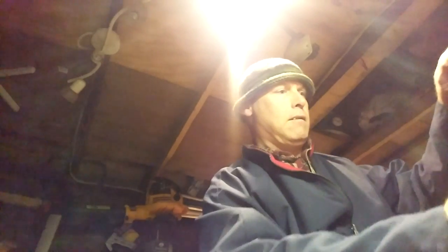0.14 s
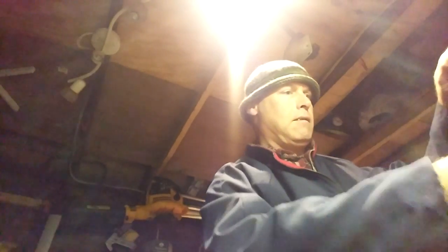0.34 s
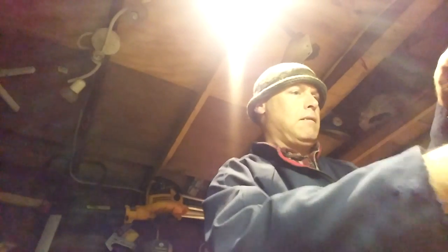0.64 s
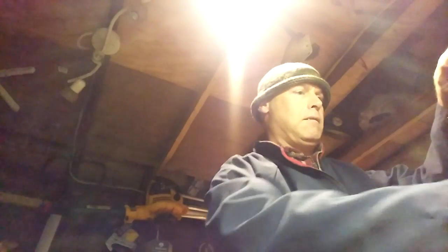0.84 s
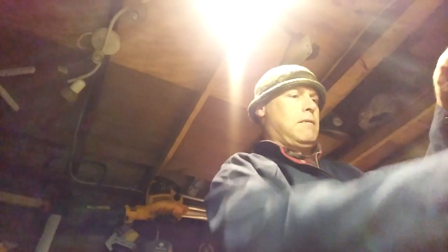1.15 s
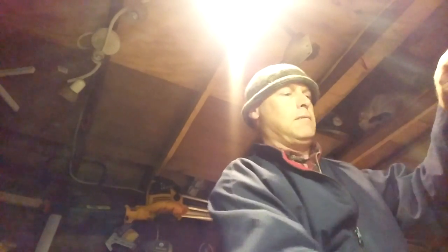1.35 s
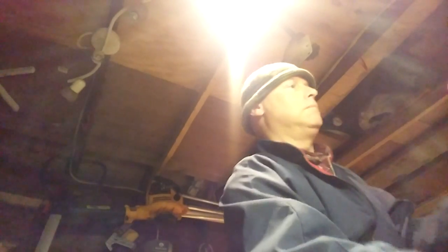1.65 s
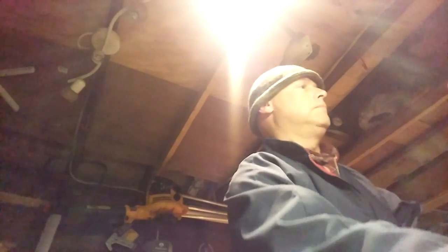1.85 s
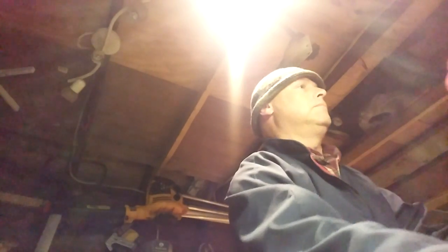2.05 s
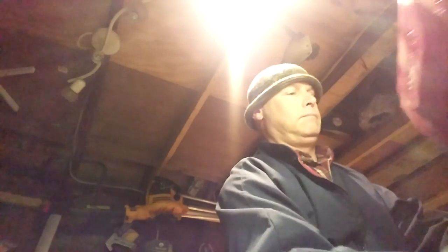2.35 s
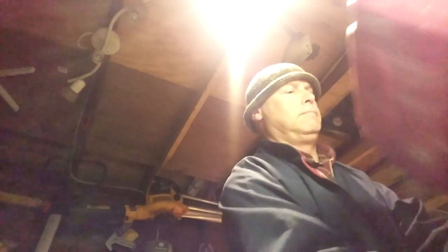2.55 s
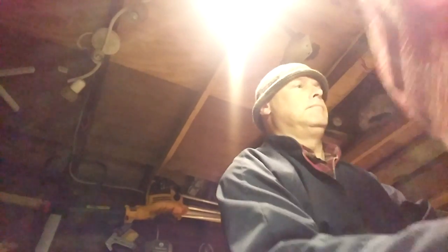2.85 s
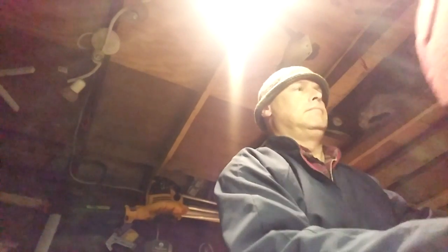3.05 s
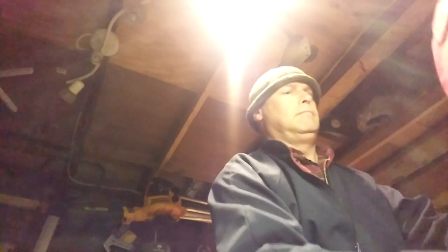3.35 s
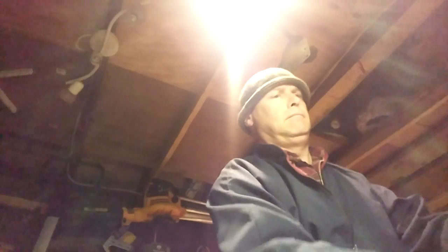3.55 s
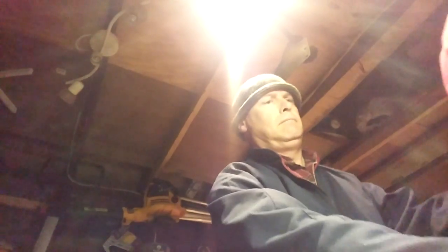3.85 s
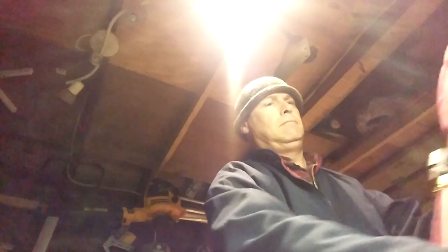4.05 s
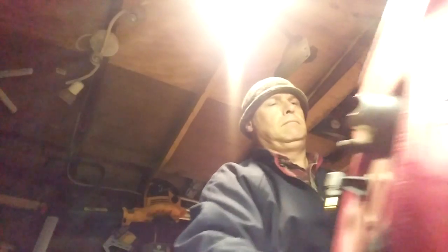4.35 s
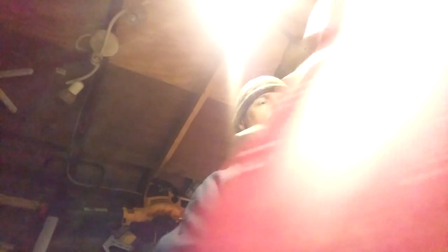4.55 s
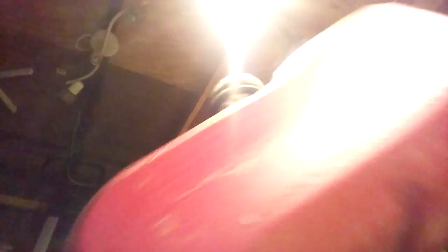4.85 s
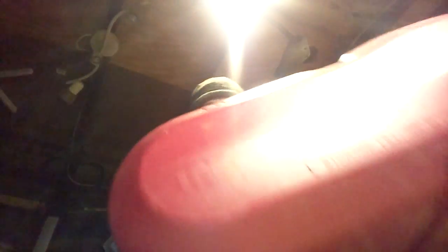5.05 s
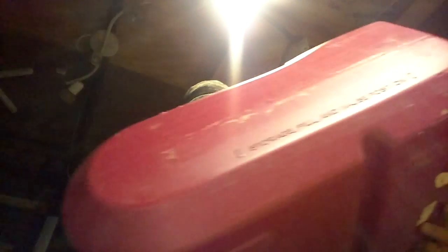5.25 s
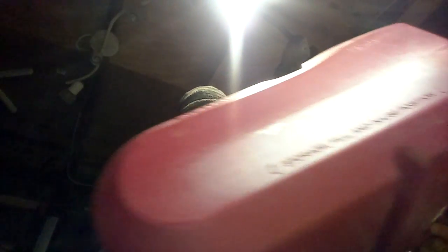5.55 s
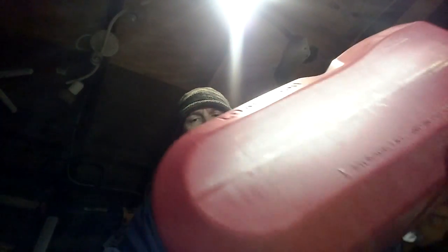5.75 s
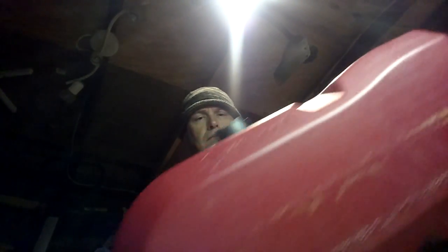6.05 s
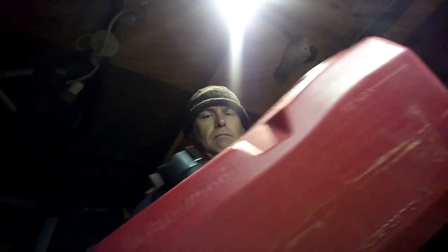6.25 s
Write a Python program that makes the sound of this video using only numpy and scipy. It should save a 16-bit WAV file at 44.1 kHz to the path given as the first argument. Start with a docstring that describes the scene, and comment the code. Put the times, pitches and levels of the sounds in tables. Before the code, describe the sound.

Close, rough handling of an empty plastic fuel can in a small, dry garage. From 0 to 1.3 s uneven dull knocks and bench rumble mix with short rubs of hands and sleeves; the thumps sound boxy and hollow. Around 1.5 to 1.8 s a knock and brighter swishing rustles follow, then a quieter gap. At 2.4 s sharper knocks bring a brief metallic rattle. From 3.2 to 3.7 s comes the loudest clatter: heavy, bouncing plastic bangs, harsh scraping and a bright jingling fitting, slightly distorted. Smaller bumps lead to a strong rasping drag at 4.1 to 4.3 s, ending in two hard, booming blows. Rubbing fades by 4.7 s into near silence. At 5.2 s one clear hollow knock with a plastic click stands out, then faint ticks, very soft hollow tones and a barely audible rub near 6.3 s over low background hiss.

```python
"""From the start hands and sleeves rub a hollow plastic fuel can as it is knocked and slid on a garage bench.
Blows excite damped modes of walls, enclosed air and bench; random slips make the rubbing and dragging.
From 2.4 s a loose metal fitting rings on some blows, as decaying sines, and the loudest blows overload the input.
At the end the can is held almost still: short bursts make it tick and soft decaying sines sound hollow."""
import sys
import numpy as np
from scipy import signal
from scipy.fft import rfft, irfft
from scipy.io import wavfile

SR = 44100
rng = np.random.default_rng(int(sys.argv[2]) if len(sys.argv) > 2 else 0)


def pcm_store(signal):
    """Save signal as 16-bit PCM."""
    levels = np.round(np.clip(np.atleast_2d(signal), -1, 1) * 32767)
    wavfile.write(sys.argv[1], SR, levels.astype(np.int16).T)


N = 282681

# Strokes of hands and sleeves. Each row: start, turning point and end in seconds (an end before the start
# leaves only a fading trace), swell in dB (negative for a dip), then relative levels in dB of the hiss,
# the drag on the walls and the rumble through the bench.
STROKES = [(0, .09, 0.16, -3, -55.5, -44, -32), (0.195, 0.29, 0.32, 9.5, -47.5, -51.5, -43),
           (0.378, 0.42, 0.585, 8, -43, -36.5, -25), (0.707, 0.761, 0.94, 22.5, -35.5, -37, -30.5),
           (0.978, 1.07, 1.18, 6, -43, -41.5, -31.5), (1.18, 1.253, 1.324, 0.5, -60, -46.5, -34),
           (1.294, 1.326, 1.33, 8, -48.5, -54, -47), (1.39, 1.404, 1.41, 0, -66, -49.5, -36),
           (1.519, 1.616, 1.694, 7, -29, -40.5, -54), (1.683, 1.77, 1.835, 7, -37, -34, -48),
           (1.82, 1.864, 1.91, -2, -53, -59, -52), (2.064, 2.084, 2.17, 2, -47.5, -43.5, -33),
           (2.185, 2.22, 2.32, 0.5, -42.5, -42.5, -35), (2.325, 2.42, 2.49, 1, -42, -38.5, -28),
           (2.463, 2.49, 2.58, 5.5, -42.5, -34, -22.5), (2.643, 2.68, 2.883, 8, -31.5, -33.5, -25.5),
           (2.868, 3.06, 3.18, 4, -41, -47, -43), (3.05, 3.18, 3.36, 8.5, -36.5, -34.5, -25.5),
           (3.254, 3.298, 3.4, 11, -31, -24, -28.5), (3.38, 3.434, 3.77, 11.5, -35, -46, -26),
           (3.61, 3.65, 3.6, 10.5, -24, -50, -33.5), (3.78, 3.84, 3.96, 4, -40, -44, -30),
           (3.937, 3.97, 4.05, 1, -38, -35, -38), (4.062, 4.26, 4.285, 9, -21, -19.5, -48),
           (4.29, 4.31, 4.39, 3.5, -30.5, -27, -32), (4.403, 4.412, 4.563, 10.5, -40.5, -37, -36),
           (4.566, 4.623, 4.714, 5.5, -45, -41, -50), (4.63, 4.698, 4.72, 4, -39, -51, -54),
           (4.73, 4.76, 4.8, 8, -57, -76, -61), (4.933, 5.018, 5.16, 8.5, -53, -45.5, -66),
           (5.211, 5.229, 5.35, 10.5, -41, -28.5, -50), (5.34, 5.37, 5.495, 7, -52.5, -46, -41.5),
           (5.5, 5.522, 5.1, 8, -66.5, -64, -68), (5.68, 5.711, 5.78, 7, -74, -61, -81),
           (5.78, 5.906, 5.94, 9, -59, -52, -77), (6.2, 6.309, 6.6, 15, -61.5, -67, -76)]
RISE_DB_PER_S, FALL_DB_PER_S = 1503, 501   # how fast a stroke sets in and breaks off
# The resting grip between strokes. Each row: time in seconds, relative hiss, drag and rumble in dB.
GRIP = [(0, -57, -51, -45), (1.3, -62.5, -63, -43), (1.5, -73, -64, -54), (1.95, -56, -59, -47.5),
        (2.6, -62, -49, -45), (4.0, -42, -47, -44), (4.5, -53, -52.5, -52), (4.9, -65, -59.5, -72),
        (5.5, -68, -72, -66), (6.1, -75, -76, -98), (6.41, -75.5, -81, -78)]
# Spectrum of rubbing at the microphone. Each row: frequency in Hz, relative level in dB per Hz.
HISS = [(900, -34.5), (1500, -12), (2600, -18.5), (4550, -13), (7300, -11.5), (9200, -2.5), (11000, -10),
        (13000, -17.5), (16000, -21)]
# Spectrum of the broad part of the drag. Each row: frequency in Hz, relative level in dB per Hz.
DRAG = [(60, -32), (110, -1), (256, -8.5), (400, -1.5), (760, -6.5), (1200, -5.5), (2200, -17.5),
        (4000, -31.5), (6000, -41)]
CRACKLES_PER_S, CRACKLE_DB = 350, 2.5   # loose snaps in the drag, against its level
# Spectrum of the background noise. Each row: frequency in Hz, relative level in dB.
AIR_SPECTRUM = [(26, -35.5), (45, -5), (133, 0), (442, -17), (723, -1), (838, -4.5), (3750, -13),
                (9090, -19), (16000, -27)]
AIR_DB = -67
GARAGE_T60_S, GARAGE_DB = 0.23, -16

# Blows on the can. Each row: time in seconds, relative level of the low wall modes in dB, their lean in
# dB per octave, relative hard edge, bench boom and hollow in dB, span of the rebounds in ms.
# The span is rounded to whole rebound periods; one that rounds below zero leaves the blow silent.
KNOCKS = [(0.011, -15, -2, -34.5, -49, -29.5, 0), (0.087, -10.5, 1, -23.5, -29, -15, 0),
          (0.226, -39, -3, -51.5, -42, -28.5, 0), (0.325, -19.5, 4, -38.5, -32, -29, 2),
          (0.367, -8, 8, -17, -26, -19, 0), (0.398, -20, -2, -33, -36, -23, 0),
          (0.433, -17.5, 6, -28.5, -46, -30, 4), (0.497, -12.5, -3, -32.5, -46, -23.5, 0),
          (0.541, -22.5, -2, -38, -42, -27, 0), (0.57, -39, -12, -57, -36, -29.5, 0),
          (0.69, -18.5, -1, -40, -51, -24, 0), (0.71, -20, 3, -34.5, -43, -21.5, -3),
          (0.728, -7, 3.5, -26, -48, -24, 0), (0.798, -12, 1, -22.5, -33.5, -13, 14),
          (0.972, -28.5, -18, -54, -46, -31.5, 1), (1.031, -24.5, 7, -35.5, -53, -45, -7),
          (1.131, -17, -10.5, -29, -49, -27, 0), (1.299, -37, -10.5, -52, -59, -33.5, 0),
          (1.508, -10, -5.5, -27, -54, -37, 0), (1.726, -29, -3, -38, -37, -38, 0),
          (1.817, -27, -12.5, -45, -38, -29.5, 14), (2.068, -30, -7, -65, -54, -28, 0),
          (2.172, -19.5, -5.5, -36.5, -32, -27.5, 0), (2.394, -7.5, -8, -26, -38, -19.5, 0),
          (2.404, -10.5, -0.5, -12.5, -16.5, -18.5, 0), (2.433, -15.5, -2, -18.5, -25, -20, 0),
          (2.478, -15, 4, -15, -22.5, -35, 0), (2.597, -23.5, -2, -30.5, -51, -22, 25),
          (2.654, -21.5, -11, -37, -42, -27.5, 0), (2.708, -17, 7, -24, -44, -53, 0),
          (2.95, -31, 6, -39.5, -54.5, -46, 0), (3.024, -33.5, -4, -52.5, -54.5, -27.5, -5),
          (3.135, -15.5, -3, -38, -26, -22.5, 0), (3.193, -10, -3.5, -20.5, -16, -18.5, 4),
          (3.246, 1, -8, -11, -10, -9.5, 84), (3.419, -3, -1, -8, -15, -15.5, 14),
          (3.466, -8.5, 1.5, -15.5, -15, -23.5, 0), (3.502, -20, 0.5, -29, -15, -25.5, 0),
          (3.538, -15, 4, -19.5, -21.5, -33.5, 0), (3.587, 0.5, 1.5, -7, -14.5, -14.5, 67),
          (3.723, -24.5, 0, -40.5, -34, -45.5, 0), (3.857, -14.5, 1.5, -29.5, -18, -19.5, 0),
          (3.87, -33, 0, -16.5, -29, -30.5, 0), (3.895, -28, -5, -32.5, -34, -22.5, 5),
          (3.962, -19.5, -4, -33, -38.5, -33, 0), (4.282, -0.5, -0.5, -11, -11, -32.5, 9),
          (4.338, -5, -2.5, -12.5, -7, -10, 2), (4.368, -31, 3, -26.5, -9, -17.5, 5),
          (4.497, -32.5, -1.5, -62, -31, -44, 0), (4.955, -61, -1, -48, -62, -49, 0),
          (5.057, -52.5, 10, -43, -70, -62, 0), (5.232, -4.5, 4, -21, -30, -17.5, 14)]
REBOUND_S, REBOUND_SPREAD = 0.0125, 0.12   # period, in step with the boom; spread in periods
# loss in dB: at each rebound; at the first one more; of the push on the bench at each rebound
REBOUND_LOSS_DB, FIRST_LOSS_DB, BOOM_LOSS_DB = 2.5, 5.5, 2
CONTACT_MS, SOFT_DB_PER_DOUBLING = 2, 9.5   # contact of an even blow; a duller one touches longer
CRACK_DB = -0.5   # crack against the hard edge
# Modes of the can's walls and air. Each row: frequency in Hz, relative level in dB, t60 in seconds.
WALLS = [(261.9, -8.5, 0.13), (302, -8, 0.11), (395, 2, 0.046), (437.3, -8.5, 0.071), (519.5, -10, 0.11),
         (558.3, -10, 0.21), (613, 2, 0.035), (743, -12, 0.1), (794, -9, 0.056), (921, -5, .05),
         (1045, -11, 0.065), (1130, -8, 0.077), (1282, 6, 0.015), (1276, -12, 0.06), (1446, -14.5, 0.032),
         (1764, -12.5, 0.055), (1917, -13.5, 0.055), (2220, -26, 0.11), (2370, -15.5, 0.028),
         (3000, -19, 0.019)]
# Modes of the can on the bench. Each row: frequency in Hz, relative level in dB, t60 when struck in seconds.
BOOM = [(61.5, -14.5, 0.38), (80.6, -0.5, 0.18)]
# Air and big faces of the can. Each row: frequency in Hz, relative level in dB, t60 when struck in seconds.
HOLLOW = [(139.4, -3, 0.2), (174.5, 0.5, 0.12)]

# The metal fitting is shaken against its seat. Each row: time in seconds, relative level in dB,
# lower modes against the top ones in dB.
FITTING = [(2.412, -8.5, 2.5), (2.434, -17, -2), (2.482, -18.5, 11), (3.194, -21, -1.5), (3.258, -6, 2),
           (3.279, -3.5, -4.5), (3.293, -16, -0.5), (3.328, -20.5, -0.5), (3.423, -18.5, 1.5),
           (3.437, -4.5, -5), (3.468, -8, 0.5), (3.500, -21.5, -5.5), (3.541, -25.5, 2.5),
           (3.595, -3.5, 1.5), (3.604, -6.5, 0.5), (3.620, -7.5, -1.5), (3.635, -16, -4), (3.655, -5.5, -1),
           (3.720, -33, 1.5), (3.875, -22, 5.5), (4.302, -13, 1.5), (4.337, -22, -5)]
# Modes of the metal fitting. Each row: frequency in Hz, relative level in dB, t60 in seconds.
METAL = [(2115, -1.5, 0.018), (3255, -5.5, 0.028), (5425, -18, 0.11), (8160, -7.5, 0.048),
         (9520, -20, 0.066), (10650, -15, 0.28), (10630, -8.5, 0.17), (10830, -17, 0.18),
         (15230, -31.5, .07)]
DAMPING_DB_PER_S = 400   # added fall of a choked fitting or a hand-damped note

# The plastic ticks as it is held. Each row: time in seconds, relative level in dB, pitch in Hz.
TICKS = [(4.7965, -34.5, 2610), (5.181, -31, 2590), (5.2253, -15, 1500), (5.2342, -2, 1460),
         (5.3609, -20, 8350), (5.382, -24.5, 2830), (5.4368, -24.5, 2140), (5.4664, -25.5, 2300),
         (5.5143, -35.5, 5560), (5.564, -40, 3330), (5.6928, -34, 1895), (5.757, -40.5, 1581),
         (5.8296, -41, 1580), (5.857, -38.5, 1950), (5.9, -33, 1640)]
# Faint hollow notes. Each row: start in seconds, relative level in dB, pitch in Hz, free t60 in seconds,
# seconds until the hand damps it.
NOTES = [(4.955, -37.5, 188.8, 0.17, .1), (5.16, -39, 1255, 0.06, 0.054), (5.29, -36, 745, 0.63, 0.16),
         (5.28, -40, 525, .6, 0.17), (5.70, -58, 765, 0.15, .08), (5.899, -52, 520, 0.47, 0.12)]

BASS_CUT_HZ, CUTOFF_HZ = 28, 16400
OVERLOAD, OFFSET = 0.8, -0.0005   # sample values, full scale 1


def from_db(db):
    """Logarithmic level: 20 dB is a factor of ten in amplitude."""
    return 10 ** (np.asarray(db) / 20)


def rms_one(x):
    """Power normalization: scale to unit root mean square."""
    return x / np.sqrt(np.mean(x ** 2) + 1e-20)


def in_time(rows):
    """Linear interpolation: table columns become curves with one value a sample."""
    s, *columns = np.transpose(rows)
    return [np.interp(np.arange(N) / SR, s, column) for column in columns]


def filtered(x, order, band_hz, kind="low"):
    """Butterworth filtering: a maximally flat pass band."""
    return signal.sosfilt(signal.butter(order, band_hz, kind, fs=SR, output="sos"), x)


def coloured(x, spectrum):
    """Spectral shaping: weight a white signal's bins along log frequency; rms 1."""
    hz, db = np.transpose(spectrum)
    bins = np.maximum(np.fft.rfftfreq(N, 1 / SR), 1)
    gains = from_db(np.interp(np.log(bins), np.log(hz), db))
    return rms_one(irfft(rfft(x) * gains, N))


def drift(rate_hz):
    """Slow random fluctuation: white noise through two equal one-pole low-passes; rms 1."""
    r = np.exp(-2 * np.pi * rate_hz / SR)
    noise = rng.standard_normal(N + SR)
    settled = signal.lfilter([1], [1, -2 * r, r * r], noise)[SR:]
    return rms_one(settled)


def ring(force, hz, t60):
    """Damped resonance: a unit click sets a decaying sine of starting height 1 ringing."""
    r = from_db(-60 / (t60 * SR))
    w = 2 * np.pi * hz / SR
    return signal.lfilter([0, np.sin(w)], [1, -2 * r * np.cos(w), r * r], force + 1e-18)


def grains(per_s, spread_db):
    """Stick-slip friction: random slips of uneven size and sign."""
    sizes = from_db(spread_db * np.minimum(rng.exponential(1, N), 4))
    signed = sizes * rng.choice([-1, 1], N)
    return signed * (rng.random(N) < per_s / SR)


def contacts(times, gains, lengths_ms, chatter):
    """Impact force: each contact is a sharp push followed by a dying chatter."""
    length = len(chatter[0])
    force, after = np.zeros(N + length), np.arange(length) / SR
    for s, gain, ms, noise in zip(times, gains, lengths_ms, chatter):
        burst = noise * np.exp(-after * 1000 / max(ms, 0.2))
        burst = burst * (1 - np.exp(-after / 0.0008))
        burst = burst / np.sqrt(np.sum(burst ** 2) + 1e-20)
        push = 1.59 * burst + 0.53 * (after == 0)
        at = round(s * SR)
        force[at:at + length] += gain * push
    return force[:N]


def struck(modes, times, levels_db, lengths_ms, spread_db, colour_db=lambda hz: 0, rough=True):
    """Modal superposition: each blow drives all modes unevenly; colour_db(hz) weights blows by frequency."""
    chatter = rough * rng.standard_normal((len(times), 2048))
    luck_db = spread_db * rng.standard_normal((len(times), len(modes)))
    out = np.zeros(N)
    for k, (hz, db, t60) in enumerate(modes):
        gains = from_db(levels_db + db + luck_db[:, k] + colour_db(hz))
        force = contacts(times, gains, lengths_ms, chatter)
        out += (-1) ** k * ring(force, hz, t60)
    return out


def strokes():
    """Friction envelopes: each stroke sets in, swells or dips, and breaks off abruptly to the resting grip."""
    t, levels_db = np.arange(N) / SR, np.array(in_time(GRIP))
    for start, turn, end, swell_db, *turn_levels_db in STROKES:
        turn = np.clip(turn, start, end)
        shape_db = np.interp(t, [start, turn, end], [-swell_db, 0, -swell_db])
        shape_db = shape_db - RISE_DB_PER_S * np.maximum(start - t, 0)
        shape_db = shape_db - FALL_DB_PER_S * np.maximum(t - end, 0)
        levels_db = np.maximum(levels_db, shape_db + np.array(turn_levels_db)[:, None])
    return levels_db


def handling():
    """Friction excitation: dense slips hiss, coarser ones drive the walls, noisy pushes the bench."""
    hiss_db, drag_db, rumble_db = strokes()
    grip_db = drift(25)   # the grip wavers, and the hiss and drag with it; the crackle wavers by itself
    hiss = coloured(grains(9000, spread_db=2), HISS)
    hiss = hiss * from_db(hiss_db + grip_db + 1.4 * drift(52))

    slips = grains(860, spread_db=4.5) * from_db(drag_db + grip_db + 1.1 * drift(40))
    walls = sum((-1) ** k * from_db(db) * ring(slips, hz, t60) for k, (hz, db, t60) in enumerate(WALLS))
    broad = coloured(grains(2000, spread_db=1.5), DRAG)
    broad = broad * from_db(drag_db - 4 + grip_db + 0.95 * drift(50))

    pushes = rng.standard_normal(N) * from_db(rumble_db + 2 * drift(15))
    # the bench modes die sooner here than when struck
    bench = sum(from_db(db) * ring(pushes, hz, 0.16 * t60) for hz, db, t60 in BOOM + HOLLOW)

    snaps = grains(CRACKLES_PER_S, spread_db=5.5) * from_db(drag_db + CRACKLE_DB + 4 * drift(30))
    crackle = filtered(snaps, 2, [400, 5000], "band")
    return hiss + crackle + from_db(-30.5) * walls + broad + from_db(-30) * bench


def background():
    """Stationary noise: a steady random signal with a fixed spectrum."""
    return from_db(AIR_DB) * coloured(rng.standard_normal(N), AIR_SPECTRUM)


def garage(x):
    """Diffuse reverberation: convolution with the dull decaying noise tail of a cluttered garage."""
    after = np.arange(SR // 2) / SR
    tail = rng.standard_normal(len(after)) * from_db(-60 * after / GARAGE_T60_S)
    tail = tail * (after > 0.006)   # gap before the first reflections
    tail = signal.lfilter(*signal.butter(1, 3500, fs=SR), tail)
    tail = tail / np.sqrt(np.sum(tail ** 2))
    return from_db(GARAGE_DB) * signal.fftconvolve(x, tail)[:N]


def blows():
    """Inelastic rebound: each knock returns weaker; gives times, levels and contact lengths in ms."""
    rows, luck = [], rng.standard_normal((len(KNOCKS), 8))
    for (s, low_db, lean_db, edge_db, boom_db, hollow_db, span_ms), uneven in zip(KNOCKS, luck):
        rebounds = min(round(span_ms / 1000 / REBOUND_S), 7)
        for k in range(rebounds + 1):
            loss_db = REBOUND_LOSS_DB * k + FIRST_LOSS_DB * (k > 0)
            at = s + REBOUND_S * (k + REBOUND_SPREAD * uneven[k] * (k > 0))
            rows.append((at, low_db - loss_db, lean_db, edge_db - loss_db / 2,
                         boom_db - BOOM_LOSS_DB * k, hollow_db - loss_db))
    s, low_db, lean_db, edge_db, boom_db, hollow_db = np.transpose(rows)
    contact_ms = CONTACT_MS * 2 ** ((low_db - edge_db) / SOFT_DB_PER_DOUBLING)
    return s, low_db, lean_db, edge_db, boom_db, hollow_db, np.clip(contact_ms, 1.5, 15)


def knocks():
    """Impact excitation: blows ring walls, hollow and bench, with unpitched scuffs and a crack."""
    s, low_db, lean_db, edge_db, boom_db, hollow_db, ms = blows()

    def wall_colour_db(hz):
        """Contact spectrum: low modes follow the leaning low level, higher ones the hard edge."""
        return low_db + lean_db * np.log2(hz / 450) if hz < 870 else edge_db + 7.0

    walls = struck(WALLS, s, -11.5, ms, 2.0, wall_colour_db)
    boom = struck(BOOM, s, boom_db + 7, ms, 0.94, rough=False)
    hollow = struck(HOLLOW, s, hollow_db + 7, ms, 0.58, rough=False)
    lows = filtered(boom + hollow, 2, 300)   # a heavy body starts softly

    chatter, scuffs = rng.standard_normal((len(s), 2048)), np.zeros(N)
    # dull scuff, bright scuff, crack: level in dB, band in Hz, stretch of the contact
    for level_db, band_hz, stretch in [(low_db + 22, [250, 900], 2.5),
                                       (edge_db + 23.5, [900, 3200], 2.2),
                                       (edge_db + CRACK_DB + 16.5, [3000, 11000], 1.2)]:
        push = contacts(s, from_db(level_db), stretch * ms, chatter)
        scuffs += filtered(push, 2, band_hz, "band")
    scuffs = filtered(scuffs, 2, 11500)
    port = ring(scuffs, 9200, 0.0015) * from_db(-20)   # the microphone port lifts the top
    return walls + lows + scuffs + port


def fitting():
    """Free vibration with damping: short touches ring metal modes; the next touch chokes them."""
    s, db, lower_db = np.transpose(FITTING)
    hz, mode_db, t60 = np.transpose(METAL)
    out, after = np.zeros(N + SR // 2), np.arange(SR // 2)[:, None] / SR
    luck = rng.standard_normal((len(s), 2, len(hz)))
    rise = 1 - np.exp(-after / 0.001)
    for k, free_s in enumerate(np.diff(s, append=N / SR)):
        start_db = db[k] - 3 + mode_db + lower_db[k] * (hz < 10000) + 2.0 * luck[k, 0]
        fall_db = 60 * after / t60 + DAMPING_DB_PER_S * np.maximum(after - free_s, 0)
        shifted_hz = hz * (1 + 0.0015 * luck[k, 1])   # the seat shifts the pitch a little
        modes = rise * from_db(start_db - fall_db) * np.sin(2 * np.pi * shifted_hz * after)
        at = round(s[k] * SR)
        out[at:at + len(after)] += np.sum(modes, axis=1)
    return out[:N] * from_db(2.3 * drift(58))   # it buzzes in the seat


def ticks():
    """Heavily damped resonance: a brief crackle rings for a few cycles."""
    out = np.zeros(N)
    crackle = rng.standard_normal((len(TICKS), 1, 2048))
    for (s, db, hz), noise in zip(TICKS, crackle):
        push = contacts([s], [from_db(db - 5)], [5.0], noise)
        out += ring(push, hz, 7.2 / hz)
    return out


def hollow_notes():
    """Soft-onset free decay: sines swell in over a few ms, ring and are damped by the hand."""
    out, swell = np.zeros(N), np.hanning(round(0.0072 * SR))
    waver = drift(22.9)   # every note follows the same waver from its start
    for s, db, hz, t60, free_s in NOTES:
        at = round(s * SR)
        after = np.arange(min(SR // 2, N - at)) / SR
        fall_db = 60 * after / t60 + DAMPING_DB_PER_S * np.maximum(after - free_s, 0)
        shape = np.convolve(from_db(-fall_db), swell / swell.sum())[:len(after)]
        level = from_db(db + 2.24 * waver[:len(after)])
        out[at:at + len(after)] += level * shape * np.sin(2 * np.pi * hz * after)
    return out


def scene():
    """Linear superposition: can, room and background add at one microphone, on two equal channels."""
    can = handling() + knocks() + fitting() + ticks() + hollow_notes()
    heard = can + garage(can) + background()
    return np.array([heard, heard])


def record(dry):
    """Band-limited saturation: capsule bass cut, input overload, top cut and converter offset."""
    dry = filtered(dry, 2, BASS_CUT_HZ, "high")
    clipped = dry / (1 + np.abs(dry / OVERLOAD) ** 8) ** (1 / 8)
    top_cut = signal.cheby2(14, 70, CUTOFF_HZ, fs=SR, output="sos")
    return signal.sosfilt(top_cut, clipped) + OFFSET


dry = scene()
out = record(dry)
pcm_store(out)
```